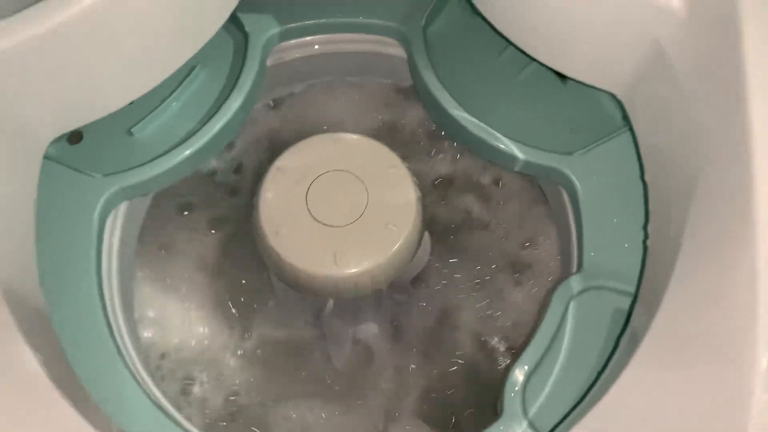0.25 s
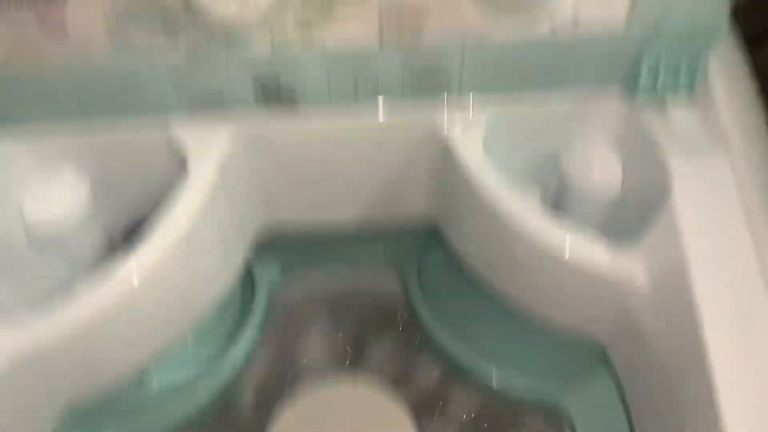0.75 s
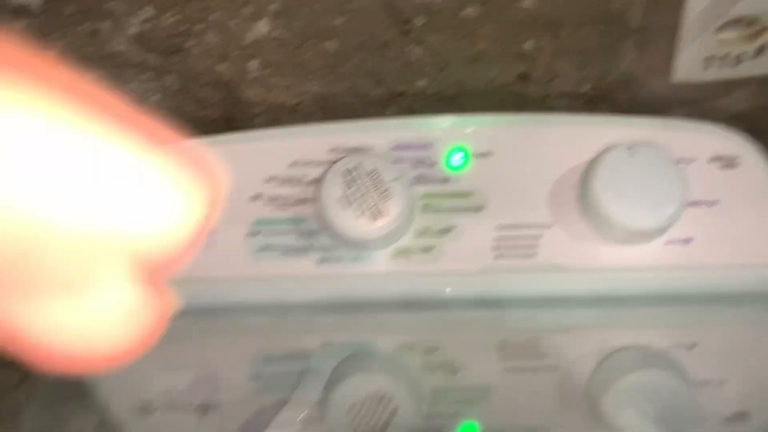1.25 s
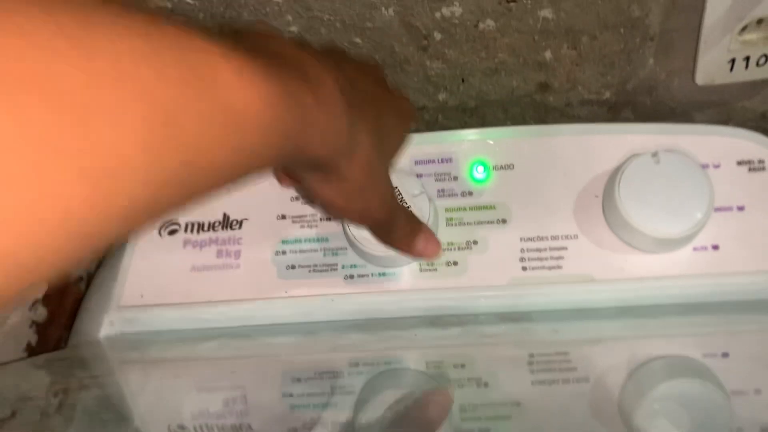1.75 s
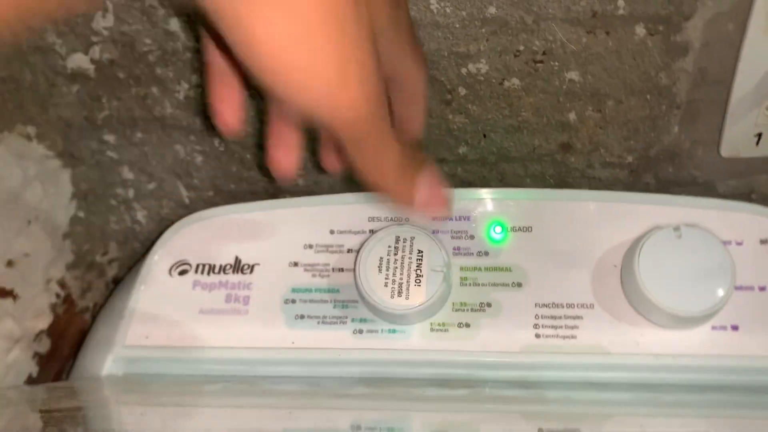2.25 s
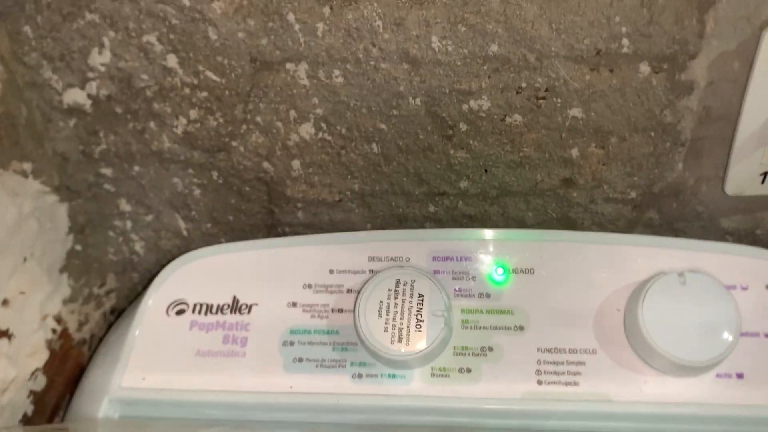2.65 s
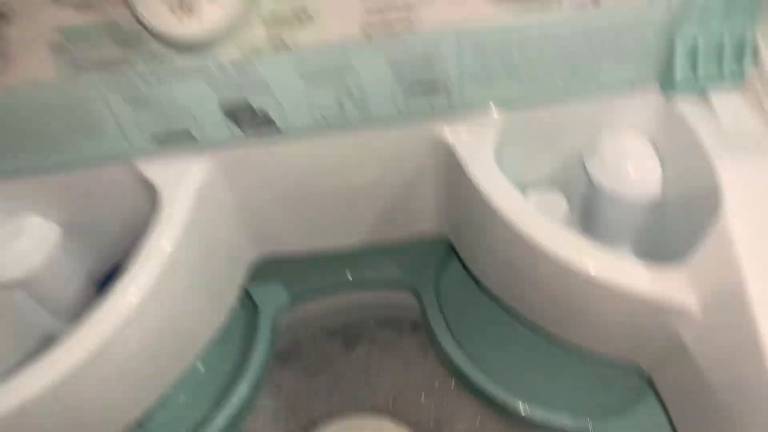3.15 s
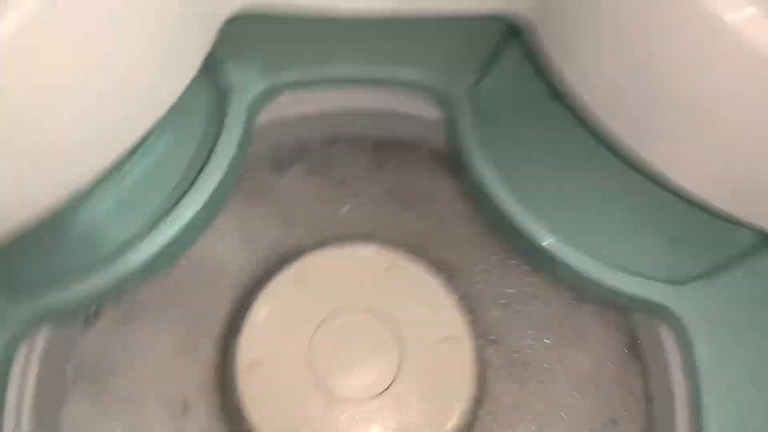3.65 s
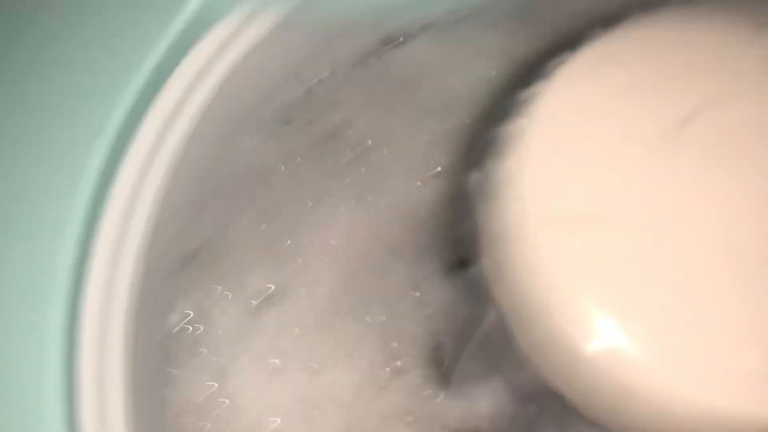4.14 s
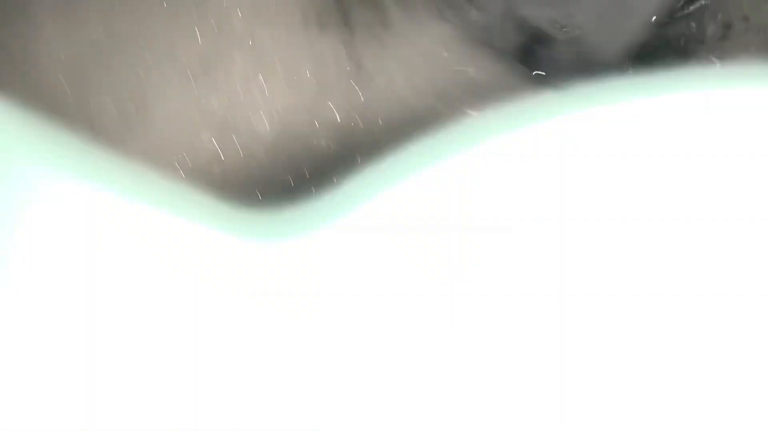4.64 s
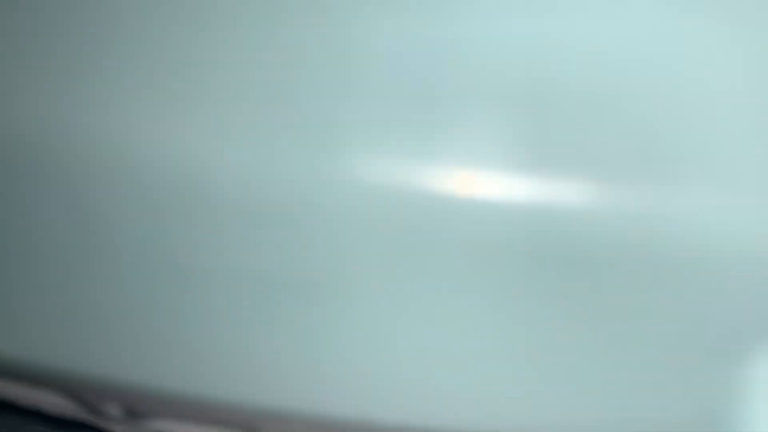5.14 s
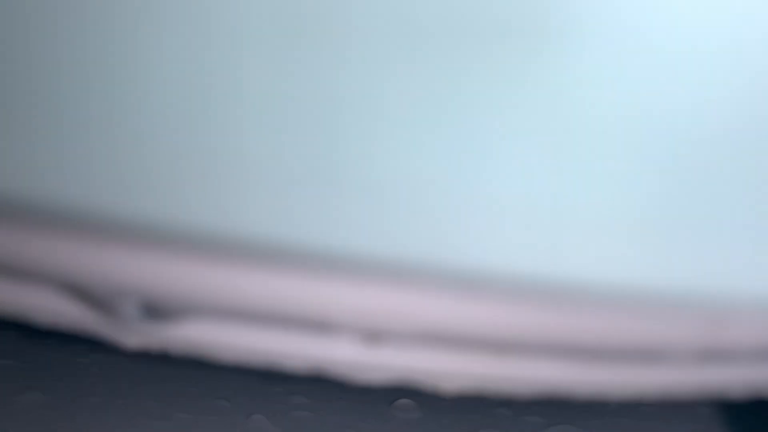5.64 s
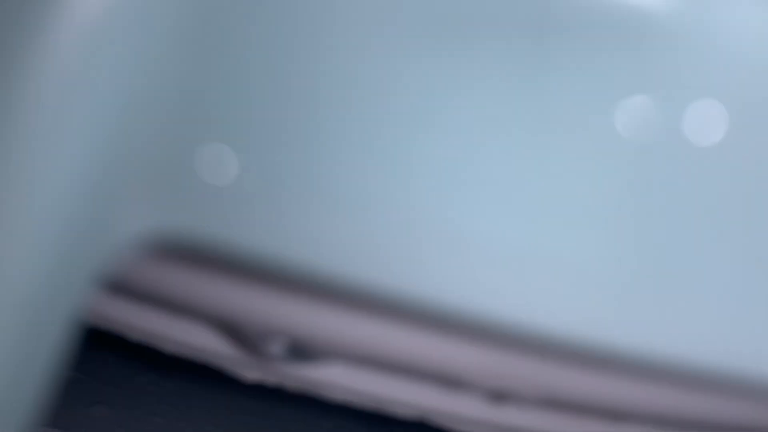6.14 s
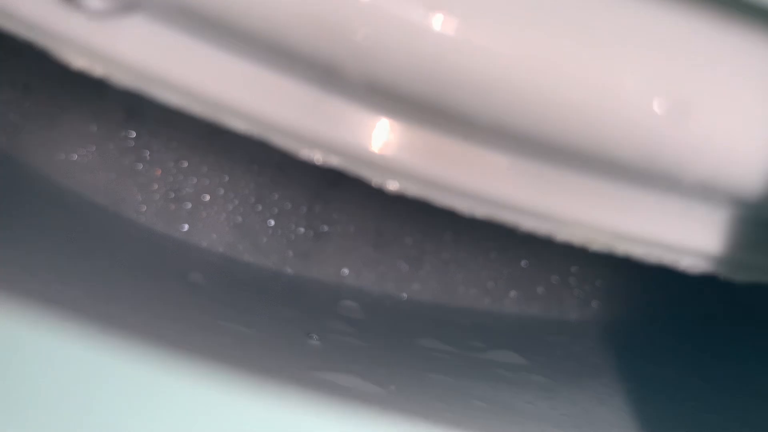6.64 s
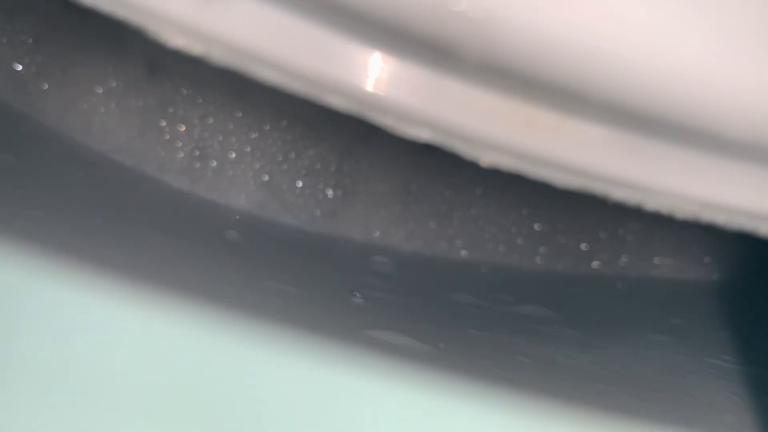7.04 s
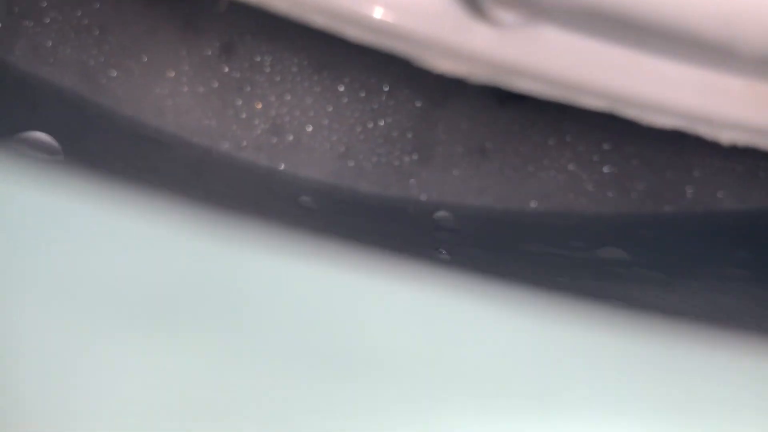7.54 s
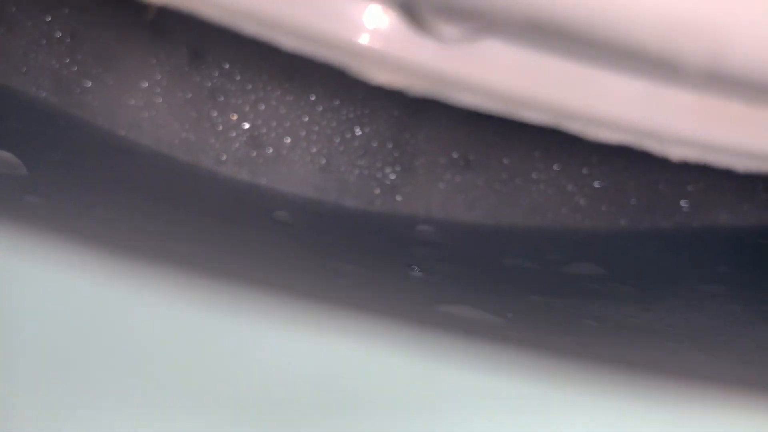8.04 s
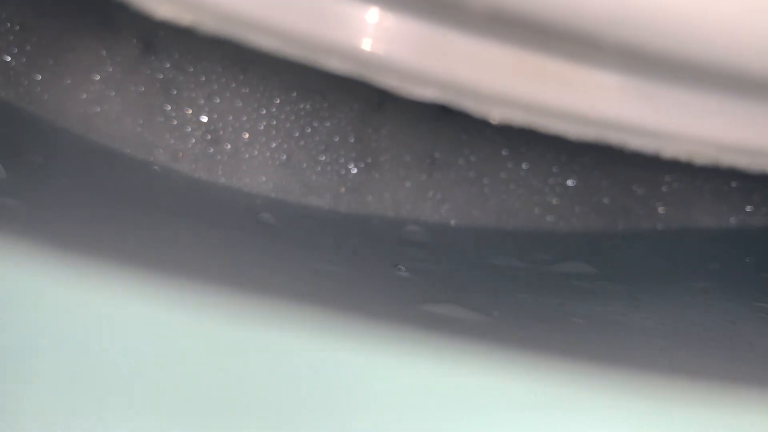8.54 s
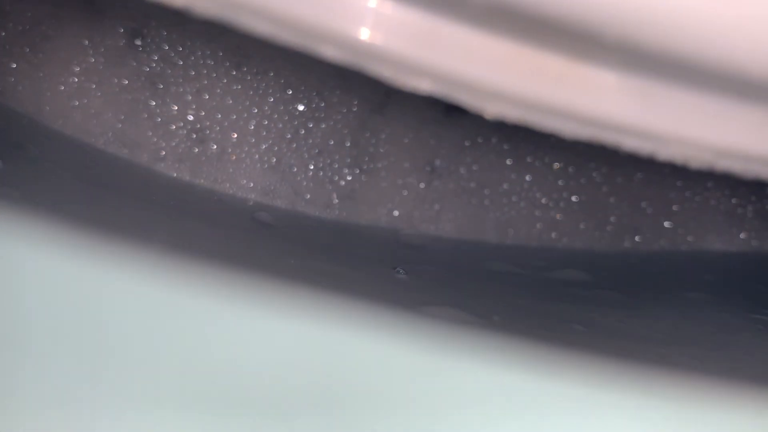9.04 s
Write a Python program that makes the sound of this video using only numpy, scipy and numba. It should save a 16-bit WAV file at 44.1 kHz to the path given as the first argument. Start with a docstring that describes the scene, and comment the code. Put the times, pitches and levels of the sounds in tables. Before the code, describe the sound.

A top-loading washing machine churns soapy water with hums and splashes, its plastic lid claps shut and lifts, then loud close gulping strokes.

```python
"""Soapy water gulps, splashes and foams as a top-loading washing machine swings its agitator; the motor hums.
The plastic lid claps shut and is lifted again, then the microphone moves down to the rim of the tub, with
a bump and a few brushes of the hand, and the strokes there are loud and wide. Water is clouds of dying sines
that climb in pitch; tub, plastic and lid ring at their own notes; the motor is steady tones and shaken
resonances; hinges, hand and drops are coloured noise."""
import sys
import numpy as np
from scipy import signal
from scipy.fft import rfft, irfft, next_fast_len
from scipy.io import wavfile
from scipy.ndimage import uniform_filter1d
from numba import njit

SR = 44100
rng = np.random.default_rng(int(sys.argv[2]) if len(sys.argv) > 2 else 0)


def generate_wav(signal):
    """Clip the signal to [-1, 1] and save it as 16-bit WAV at the path in sys.argv[1]."""
    frames = np.transpose(np.atleast_2d(signal))
    scaled = np.clip(frames, -1, 1) * 32767
    pcm = np.round(scaled).astype(np.int16)
    wavfile.write(sys.argv[1], SR, pcm)


N = 409688
TIME = np.arange(N) / SR
SHORT = TIME[:SR // 2]   # half a second, for single sounds


def from_db(db):
    """Turn decibels into gain."""
    return 10 ** (np.asarray(db) / 20)


def rms_one(x):
    """Scale to an average strength (rms) of 1."""
    return x / np.sqrt(np.mean(x ** 2) + 1e-20)


def in_time(rows):
    """Read a table whose first column is time, and draw each other column as a curve."""
    s, *columns = np.transpose(rows)
    return [np.interp(TIME, s, c) for c in columns]


def drift(rate):
    """Random values of spread 1, rate of them a second, joined by straight lines."""
    return np.interp(TIME * rate, np.arange(4000), rng.standard_normal(4000))


def colour(x, points):
    """Filter through (frequency [Hz], gain [dB]) points, with no sound ahead of its cause (minimum phase)."""
    size = 2 * next_fast_len(x.shape[-1] // 2 + 4096)
    hz, db = np.transpose(points)
    grid = np.maximum(np.fft.rfftfreq(size, 1 / SR), 1)
    gain = from_db(np.interp(np.log(grid), np.log(hz), db))
    # folding the cepstrum forward in time gives the minimum-phase filter
    cepstrum = irfft(np.log(gain))
    cepstrum[1:size // 2] *= 2
    cepstrum[size // 2 + 1:] = 0
    return irfft(rfft(x, size) * np.exp(rfft(cepstrum)))[..., :x.shape[-1]]


def add(track, s, sound):
    """Mix a sound into a track at time s."""
    at = max(round(s * SR), 0)
    track[:, at:at + sound.shape[-1]] += sound[..., :N - at]


def dying(t60):
    """Half a second of fading that falls 60 dB in t60 seconds."""
    return from_db(-60 * SHORT / t60)


def ring(hz, t60, rise=0):
    """A dying sine whose pitch climbs by the share rise within its t60."""
    return dying(t60) * np.sin(2 * np.pi * hz * SHORT * (1 + rise * np.minimum(SHORT / t60, 2) / 2))


def hollow(x, t60, wet_db):
    """Dense reflections between the tub's walls, different for centre and sides."""
    tail = rng.standard_normal((2, SR // 2)) * dying(t60) * (SHORT > .002)
    tail /= np.sqrt(np.sum(tail ** 2, axis=1, keepdims=True))
    return x + from_db(wet_db) * signal.fftconvolve(x[:1], tail, axes=1)[:, :N]


@njit
def sum_bubbles(out, at, turn, height, side, cycles, rise):
    """Each bubble is a dying sine that climbs as it nears the surface."""
    for k in range(len(at)):
        length = int(cycles * 2 * np.pi / turn[k]) + 1
        step = np.exp(-np.log(1000) / length + 1j * turn[k])   # falls 60 dB over its length
        climb = np.exp(1j * turn[k] * rise / length)
        z = height[k] + 0j
        for i in range(at[k], min(at[k] + length, out.shape[1])):
            out[0, i] += z.imag
            out[1, i] += z.imag * side[k]
            z *= step
            step *= climb
    return out


def bubbles(spectrum, per_s, cycles, spread_db, clump_db, rise, wet_db):
    """A cloud of bubbles born in clumps and ringing in the tub; its slow swells are mostly evened out."""
    rate = per_s * rms_one(from_db(clump_db * drift(55)))
    at = np.flatnonzero(rng.random(N) < rate / SR)
    pitch, size, bearing = rng.random((len(at), 3)).T
    lowest_hz, highest_hz = spectrum[0][0], spectrum[-1][0]
    hz = lowest_hz * (highest_hz / lowest_hz) ** pitch
    height = hz * from_db(spread_db * np.minimum(-np.log(1 - size), 4))
    side = np.sqrt(2) * np.cos(2 * np.pi * bearing)
    turn = 2 * np.pi * hz / SR
    cloud = sum_bubbles(np.zeros((2, N)), at, turn, height, side, float(cycles), float(rise))
    cloud = rms_one(hollow(colour(cloud, spectrum), t60=0.14, wet_db=wet_db))
    return cloud / np.sqrt(uniform_filter1d(cloud[0] ** 2, size=3500) + 0.12)


def room_tone():
    """The steady background: noise that is strongest in the bass."""
    # (frequency [Hz], gain [dB])
    room_colour = [(20, -4), (35, 6), (55, 2.5), (140, 0), (192, 0), (245, -16), (370, -13), (540, -22.5),
                   (700, -40.5), (1400, -33), (3000, -40), (5500, -40.5), (10000, -51.5), (16000, -45.5)]
    return from_db(-44) * rms_one(colour(rng.standard_normal((2, N)), room_colour))


def surge(start, stop, rise_s, db_per_s):
    """Water gathers speed, is driven until stop, then settles into a faint backwash; as power."""
    backwash_db, backwash_db_per_s = -15.5, 26
    after = np.clip(TIME - stop, 0, 3)
    level_db = np.maximum(-db_per_s * after, backwash_db - backwash_db_per_s * after)
    return (np.clip((TIME - start) / rise_s, 0, 1) * from_db(level_db)) ** 2


def churning():
    """How hard the depths, the air pockets, the surface and the foam are stirred: four levels in dB."""
    # surges of the water: (start [s], stop [s], rise [s], basic settling rate [dB/s],
    # rumble [dB], gulps [dB], splash [dB], foam against splash [dB])
    stirrings = [(-.1, 0.027, .05, 65, -33.5, -41, -45, -3.5),
                 (0.057, 0.27, 0.027, 116, -42, -57, -50.5, -2),
                 (0.262, 0.612, 0.08, 188, -49, -39, -45, -6),
                 (0.345, 0.368, 0.03, 250, -26, -55, -36.5, -6),
                 (0.893, 1.602, 0.12, 42, -37.5, -42, -47, -6),
                 (1.077, 1.17, 0.015, 113, -27, -50, -71, -8),
                 (1.756, 2.003, 0.015, 50, -42, -39, -42, -12),
                 (2.246, 3.21, 0.098, 72, -55, -57.5, -67, -43),
                 (3.594, 3.925, 0.14, 92, -40, -72, -58.5, -6),
                 (4.054, 4.21, 0.034, 67, -29.5, -38, -52, -1),
                 (4.192, 4.255, 0.1, 176, -50, -61, -38.5, -5.5),
                 (4.477, 4.665, 0.053, 116, -30, -30, -48, -3),
                 (4.79, 5.13, 0.056, 67, -44.5, -44, -73, -28),
                 (5.292, 5.44, 0.034, 226.5, -35.5, -44, -60.5, -16),
                 (6.634, 6.795, 0.038, 83, -28, -28, -46, -4),
                 (7.012, 7.31, 0.43, 103, -32.5, -39, -83, -10),
                 (7.347, 7.994, 0.079, 58, -28, -29, -40.5, -2.5),
                 (8.111, 8.21, 0.026, 220, -27, -35, -49, -7),
                 (8.245, 8.34, 0.0084, 33, -35, -33.5, -43.5, -9),
                 (8.576, 9.247, 0.25, 88, -29, -28.5, -37.5, -5.5),
                 (8.792, 8.872, 0.058, 350, -11, -25.5, -52, -12)]
    surface_lag_s, rumble_lag_s = 0.024, 0.039   # the surface breaks late, the whole body moves later still
    deep_settling, foam_settling = 0.79, 0.96   # shares of the settling rate
    waver_db, own_waver_db, waver_per_s = 2.5, 0.95, 22   # uneven sloshing: shared, and each layer's own
    power = np.full((4, N), 1e-12)
    for start, stop, rise_s, settling, rumble_db, gulp_db, splash_db, foam_db in stirrings:
        deep_rate, foam_rate = settling * deep_settling, settling * foam_settling
        surface_start = start + surface_lag_s
        power[0] += from_db(rumble_db) ** 2 * surge(start + rumble_lag_s, stop, rise_s, deep_rate)
        power[1] += from_db(gulp_db) ** 2 * surge(start, stop, rise_s, deep_rate)
        power[2] += from_db(splash_db) ** 2 * surge(surface_start, stop, rise_s, settling)
        power[3] += from_db(splash_db + foam_db) ** 2 * surge(surface_start, stop, rise_s, foam_rate)
    own = np.array([drift(waver_per_s) for _ in power])
    return 10 * np.log10(power) + waver_db * drift(waver_per_s) + own_waver_db * own


def water():
    """Bubble clouds of every size, from the big air pockets that shake the tub to the bursting foam."""
    # colours of the bubble clouds, deepest first: (frequency [Hz], gain [dB])
    deep_colour = [(30, -53), (40, -31), (52, -10.5), (66, -18), (82, -4.5), (98, -14.5), (135, -23.5),
                   (220, -43)]
    gulp_colour = [(85, -26.5), (128, 1), (155, 2), (205, 6.5), (245, -5.5), (380, -35)]
    glug_colour = [(190, -34.5), (265, 1), (345, 1), (440, 0.5), (560, -10), (700, -32), (1100, -33)]   # middle-sized air pockets
    splash_colour = [(400, -13.5), (650, 3.5), (870, 0), (1000, 2), (1450, 2), (2100, -2.5), (2800, -2.5),
                     (4500, -46)]
    gurgle_colour = [(550, 6.5), (850, -4.5), (1500, -2.5), (2400, -4), (4200, -17)]   # bigger bubbles within the splash
    spray_colour = [(1700, 1.5), (2800, -0.5), (3900, 3), (5000, -1.5), (7000, -3.5), (8500, -13),
                    (11000, -59)]
    foam_colour = [(6500, -10), (8800, -1.5), (10300, 3), (12300, 0), (15500, 1.5), (17000, -15)]
    rumble_db, gulp_db, splash_db, foam_db = churning()
    # small crests break one after another, throwing splash and foam together
    burst_db = 2.0 * drift(50)
    rumble, gulps, splash, foam = from_db([rumble_db, gulp_db, splash_db + burst_db, foam_db + burst_db])
    # glugs follow a mix of gulps and splash, and grow faster than it does
    stirring_db = gulp_db + 0.3 * (splash_db - gulp_db)
    glugs = from_db(-38 + 1.33 * (stirring_db + 40))
    spray = from_db(-1.5 + (splash_db + foam_db) / 2)
    # splashing gentler than -41 dB traps few large bubbles
    gurgle = from_db(-0.5) * splash * np.minimum(splash / from_db(-41), 1)
    out = rumble * bubbles(deep_colour, per_s=200, cycles=8.3, spread_db=1, clump_db=2, rise=.04, wet_db=-16.5)
    out += gulps * bubbles(gulp_colour, per_s=260, cycles=21.4, spread_db=2, clump_db=2, rise=.092, wet_db=-8.5)
    out += glugs * bubbles(glug_colour, per_s=520, cycles=16.4, spread_db=4, clump_db=3, rise=.1, wet_db=-4)
    out += splash * bubbles(splash_colour, per_s=2600, cycles=40, spread_db=6, clump_db=3, rise=.31, wet_db=-.5)
    out += gurgle * bubbles(gurgle_colour, per_s=260, cycles=49, spread_db=6.5, clump_db=5.5, rise=.35,
                            wet_db=4.5)
    out += spray * bubbles(spray_colour, per_s=1200, cycles=45, spread_db=2, clump_db=4, rise=.17, wet_db=4.5)
    out += foam * bubbles(foam_colour, per_s=1700, cycles=28, spread_db=-.5, clump_db=4.5, rise=.03, wet_db=3.5)
    return out


def motor(start_s, stop_s, hum_waver, buzz_waver, drive_db):
    """The motor hums at even multiples of the mains and shakes the cabinet; the load makes it waver."""
    # (middle of start [s], middle of stop [s], hum [dB], cabinet buzz [dB])
    runs = [(-.1, 0.038, -29, -39.5), (0.984, 1.613, -56, -46.5), (4.083, 4.25, -51, -51.5),
            (4.527, 4.614, -27, -41.5), (6.682, 6.753, -20, -44.5), (7.446, 7.988, -21.5, -39.5),
            (8.71, 9.236, -14.5, -38)]
    # the motor's hum, and the buzz of the panels: (multiple of the mains, level [dB], sideways share [dB])
    hum_lines = [(2, -7, -9), (4, -5.5, -24), (8, -19, -19)]
    buzz_lines = [(10, 0, 5.5), (12, -4, 11.5), (14, -20, -9), (18, -22, 11)]
    # ringing of drive and cabinet: (frequency [Hz], width of one pass [Hz], level [dB], sideways share [dB])
    resonances = [(83.5, 9, 13, -10), (213, 18, 9, 1), (403, 24, 4, -18), (445, 27, 4, -8),
                  (541, 22, -8, -2), (674, 56, -11, 3), (862, 32, -3.5, 6.5), (1090, 41, -9, 6.5),
                  (1246, 34, -3.5, -7), (1426, 65, -6, -8), (1553, 76, -10.5, 5), (1990, 70, -13, -5),
                  (2635, 52, -21, 2), (3403, 110, -11.5, 0)]
    mains_hz = 60
    load_db, load_per_s = 2.5, 7   # each line swells and sinks on its own
    hum, buzz, out = np.zeros(N), np.zeros(N), np.zeros((2, N))
    for on, off, hum_db, buzz_db in runs:
        starting = np.clip((TIME - on) / start_s + .5, 0, 1)
        running = starting * np.clip((off - TIME) / stop_s + .5, 0, 1)
        hum += from_db(hum_db) * running
        buzz += from_db(buzz_db) * running
    for level, lines, waver in ((hum, hum_lines, hum_waver), (buzz, buzz_lines, buzz_waver)):
        for multiple, db, side_db in lines:
            phase = 2 * np.pi * (multiple * mains_hz * TIME + rng.random()) + waver * drift(13)
            load = rms_one(from_db(load_db * np.clip(drift(load_per_s), -3, 1)))
            gain = np.sqrt(2) * level * from_db(db) * (1 + waver * drift(22)) * load
            out += gain * np.array([np.sin(phase), from_db(side_db) * np.cos(phase)])
    shaking = rng.standard_normal((2, N))
    for hz, width_hz, db, side_db in resonances:
        steep = [np.concatenate(signal.iirpeak(hz, hz / width_hz, SR))] * 2   # the resonance twice over
        gain = from_db([[db + drive_db], [db + drive_db + side_db]])
        out += buzz * gain * rms_one(signal.sosfilt(steep, shaking))
    return out


def groans(t60, spread, attack_s):
    """The loaded drive sounds a brief rough note: a cluster of close tones that swell and glide in pitch."""
    # (time [s], level [dB], middle pitch [Hz], climb in pitch as a share)
    notes = [(0.01, -35, 620, 0.15), (0.965, -34, 704, 0.2), (4.066, -30.5, 738, -.5),
             (4.105, -28.5, 560, 0.83), (4.505, -25, 490, .8), (6.69, -32, 736, 0.23),
             (7.388, -26.5, 774, -.25), (8.68, -27.5, 737, -0.17)]
    out, swell = np.zeros((2, N)), np.minimum(SHORT / attack_s, 1)
    for s, db, hz, climb in notes:
        for detune, bearing in rng.uniform(-1.036, 1, (9, 2)):
            tone = swell * ring(hz * (1 + spread * detune), t60, climb)
            add(out, s, from_db(db) / np.sqrt(9) * tone * [[1], [bearing]])
    return hollow(out, t60=0.14, wet_db=1)


def splashes(plop_db, slap_db, attack_s, brood_db, scatter):
    """Bubbles and droplets ring with a gliding note and shed others; crests slap the wall with bursts of drops."""
    # single bubbles, air pockets and droplets: (time [s], level before plop_db [dB], pitch [Hz])
    single_drops_and_bubbles = [(0.341, -18, 1620), (.366, -20, 1510), (.372, -27, 326), (.489, -24.5, 906),
                                (.518, -23, 1330), (1.309, -19.5, 4350), (1.367, -19.5, 3700),
                                (1.483, -20.5, 4540), (1.522, -14.5, 4500), (1.607, -18.5, 3960),
                                (1.669, -20.5, 1416), (1.788, -12, 1085), (1.818, -6, 310.6),
                                (1.86, -24, 310), (1.898, -20, 1103), (1.936, -17, 337), (2.027, -20, 1900),
                                (4.607, -14, 1235), (4.694, -14.5, 1360), (4.714, -20, 1586),
                                (6.766, -12, 288), (6.79, -18.5, 1326), (7.424, -21, 1530),
                                (7.674, -18, 1760), (7.723, -15, 1840), (7.747, -15.5, 1480),
                                (7.805, -11, 1450), (7.808, -14, 1940), (7.892, -19, 1650),
                                (8.054, -17, 2400), (8.082, -16.5, 3280), (8.16, -20.5, 1646),
                                (8.281, -15, 874), (8.316, -18, 1490), (8.34, -24, 1616),
                                (8.373, -34, 1100), (8.885, -13, 2700), (8.912, -13.5, 1620),
                                (8.975, -14.5, 1474), (8.986, -21, 1900), (9.08, -12.5, 2040),
                                (9.103, -16, 1680), (9.18, -11, 1885), (9.206, -13.5, 4640),
                                (9.227, -11.5, 1405), (9.243, -14, 4050)]
    # slaps and ticks on the plastic, mostly of crests and drops:
    # (time [s], level before slap_db [dB], treble tilt [dB], t60 [s])
    wall_slaps = [(0.053, -38.5, 5.5, .03), (0.116, -41, 12, 0.024), (0.145, -32, 1, 0.031),
                  (0.224, -41, 7.5, 0.064), (0.338, -23, -6, 0.023), (.356, -29, 0, 0.064),
                  (0.39, -32, 3, 0.026), (.427, -30.5, 4.5, 0.03), (0.486, -39.5, 13.5, 0.029),
                  (0.521, -37.5, 2, 0.11), (.57, -47, 9, 0.036), (.613, -34, -9, 0.016),
                  (0.627, -40, 12.5, 0.016), (0.834, -33, -5, 0.12), (1.285, -31.5, -4.5, 0.11),
                  (1.327, -27.5, -1.5, 0.064), (1.742, -35, 4, 0.052), (1.787, -16.5, -8, 0.024),
                  (1.806, -21.5, -9, 0.059), (1.826, -23, -3, 0.037), (1.898, -31, -9, 0.023),
                  (1.915, -30.5, 2.5, 0.055), (1.983, -33.5, 2.5, 0.078), (2.225, -42.5, -3, 0.13),
                  (2.286, -36, 1.5, 0.034), (3.619, -40, -1, 0.026), (4.262, -35, -4, 0.17),
                  (4.281, -33, -4, 0.21), (4.497, -29.5, -36, 0.11), (4.539, -37, 1, .03),
                  (4.573, -27.5, -11, 0.065), (4.604, -28, 0, 0.13), (4.691, -25.5, -3, 0.071),
                  (4.71, -30.5, 0, 0.049), (6.413, -49, -2, 0.021), (6.783, -47, -24, 0.069),
                  (7.473, -22, -5, 0.037), (7.639, -23.5, -9, 0.1), (7.67, -17.5, -6.5, 0.072),
                  (7.895, -19, -15, 0.04), (7.961, -19.5, -10, 0.089), (8.159, -29, -19, 0.057),
                  (8.195, -25, 0.5, 0.027), (8.335, -29, -1.5, 0.085), (8.435, -33.5, -9, 0.11),
                  (8.518, -40.5, 3, 0.15), (9.206, -36, 3.5, 0.23)]
    cycles, rise = 38, 0.071   # cycles that each one rings; its climb in pitch as a share
    plops, slaps = np.zeros((2, N)), np.zeros((2, N))
    for s, db, hz in single_drops_and_bubbles:
        t60 = cycles / hz
        swell = np.minimum(SHORT * hz / 2, 1)   # a bubble needs two cycles to pinch off
        add(plops, s, from_db(db + plop_db) * swell * ring(hz, t60, rise) * [[1], [rng.normal(0, 0.56)]])
        for delay, octaves, bearing in rng.uniform(-1.2, 1, (5, 3)):
            follower = swell * ring(hz * 2 ** (scatter * (octaves + 0.24)), t60 / 2, rise)
            add(plops, s + t60 * (delay + 1) / 4, from_db(db + brood_db) * follower * [[1], [2 * bearing]])
    for s, db, treble_db, t60 in wall_slaps:
        burst = rng.standard_normal((2, SR // 2)) * dying(t60) * np.minimum(SHORT / attack_s, 1)
        shape = [(400, -13.5), (1200, 3.5), (2200, 3.5), (4500, treble_db - 0.5), (14000, 2 * treble_db - 10.5)]
        add(slaps, s, from_db(db + slap_db) * colour(burst, shape))
    return hollow(plops + slaps, t60=0.19, wet_db=-5.0)


def thud(db, centre_hz, focus_db):
    """A blow rings the tub's notes, weaker by focus_db per squared octave away from its strongest pitch."""
    # notes of the water-filled tub: (frequency [Hz], level [dB], t60 [s])
    tub_modes = [(51.6, 5, 0.15), (82.5, 4.5, 0.095), (106.5, -5, 0.24), (159.8, 2, 0.18),
                 (195.2, -0.5, 0.13), (271.4, 2, 0.092), (347.5, 3, 0.087), (468, 0.5, 0.06),
                 (543, -7, 0.13)]
    out = np.zeros((2, SR // 2))
    for hz, mode_db, t60 in tub_modes:
        away_db = focus_db * np.log2(hz / centre_hz) ** 2
        gain = from_db(db + mode_db - away_db + rng.normal(0, 1))
        push = np.minimum(SHORT * hz, 1)   # a soft push, over about one cycle
        out += gain * push * ring(hz, t60) * [[rng.choice([-1, 1])], [rng.normal(0, 1.0)]]
    return out


def knocks(focus_db):
    """Water, agitator and the closing lid knock heavily on the machine, and the tub's notes ring."""
    # (time [s], level [dB], strongest pitch [Hz])
    blows = [(.185, -33.5, 150), (0.273, -27.5, 269), (0.341, -20.5, 171), (0.392, -22, 129),
             (0.439, -28, 200), (0.578, -29.5, 370), (0.859, -21.5, 200), (1.823, -18.5, 286),
             (4.071, -26.5, 181), (4.51, -17, 172), (4.604, -21, 150), (4.612, -20.5, 420),
             (6.647, -14.5, 240), (7.215, -37.5, 390), (7.361, -20, 246), (7.623, -16, 256),
             (7.961, -23, 460), (8.135, -10.5, 119), (8.198, -18, 340), (8.546, -26, 527),
             (8.859, -21, 410)]
    out = np.zeros((2, N))
    for s, db, centre_hz in blows:
        add(out, s, thud(db, centre_hz, focus_db))
    return out


def clunks(contact_s):
    """Short, hollow knocks of plastic, from the agitator or the turned dial: a set of dying notes."""
    # (time [s], level [dB])
    hollow_knocks = [(.272, -24.5), (.338, -22.5), (.442, -23.5), (.613, -25), (1.787, -23.5), (1.868, -26),
                     (4.064, -38), (4.49, -26), (4.61, -25.5), (6.636, -37.5), (7.212, -49), (7.354, -36.5),
                     (8.135, -37), (8.198, -28), (8.281, -17.5)]
    # what the plastic rings with: (frequency [Hz], level [dB], t60 [s])
    plastic_modes = [(546, -5.5, 0.05), (624, -4, 0.032), (810, -7, 0.036), (894, -5, 0.043),
                     (996, -7.5, 0.04), (1118, -6, 0.044), (1370, -10.5, 0.037), (1613, -14, 0.034)]
    out = np.zeros((2, N))
    contact = np.minimum(SHORT / contact_s, 1)
    for s, db in hollow_knocks:
        for hz, mode_db, t60 in plastic_modes:
            gain = from_db(db + mode_db + rng.normal(0, 0.61)) * rng.choice([-1, 1])
            add(out, s, gain * contact * ring(hz, t60) * [[1], [rng.normal(0, .6)]])
    return hollow(out, t60=.14, wet_db=-4)


def lid(clap_t60, tail_db, tail_t60, sharpness):
    """The lid claps shut: a short crack, a tail in the cabinet and the ringing of its own notes."""
    # colour of the clap: (frequency [Hz], gain [dB])
    clap_colour = [(71, -47), (120, -20), (362, -6.5), (513, -4), (1030, -7), (1490, -11.5), (2150, -3),
                   (2430, -6), (3900, -1.5), (7200, -12), (8660, -5), (9790, -11), (16000, -23)]
    # ringing of the lid: (frequency [Hz], level before tail_db [dB], t60 [s])
    lid_modes = [(192, -13, 0.59), (988, 8.5, 0.36), (1381, 6, 0.26), (1600, 4, 0.15), (1890, -12.5, 0.25),
                 (2235, 5.5, 0.5), (2730, 6, 0.35), (2994, -10, 0.25), (3270, 6.5, 0.39), (3510, -10, .45),
                 (3860, 6, 0.61), (4120, -7, 0.54), (4410, -2.5, 1), (4600, -22, .5), (4900, -9, .5),
                 (4930, -3, 0.76), (5715, -14.5, 0.39), (6530, -4, 0.83), (6570, -17, .5), (6680, -21, .5),
                 (7130, -8.5, 0.67), (8300, -18, .5)]
    clap_s, clap_db = .8435, -15
    out, ringing = np.zeros((2, N)), 0
    attack = np.minimum(SHORT / 0.0017, 1)
    crack = rms_one(colour(rng.standard_normal((2, SR // 2)), clap_colour))
    for hz, db, t60 in lid_modes:
        mode = rms_one(signal.lfilter(*signal.iirpeak(hz, sharpness, SR), crack))
        ringing = ringing + from_db(db) * dying(t60) * mode
    blow = crack * (dying(clap_t60) + from_db(-20) * dying(tail_t60)) + from_db(tail_db) * ringing
    add(out, clap_s, from_db(clap_db) * attack * blow)
    return out


def bumps(focus_db):
    """Hand and microphone bump the machine so close that one side hears it more; left and right."""
    # (time [s], level [dB], strongest pitch [Hz], left minus right [dB])
    touches = [(1.137, -24.5, 99, 9), (3.626, -22, 58, -2.5), (5.322, -24.5, 294, -5),
               (5.326, -13.5, 77, -10.5), (5.334, -23, 159, -4)]
    out = np.zeros((2, N))
    for s, db, centre_hz, pan_db in touches:
        add(out, s, thud(db, centre_hz, focus_db)[0] * from_db([[pan_db / 2], [-pan_db / 2]]))
    return out


def trickle():
    """Water trickles down the walls: countless tiny bubbles merge into a smooth wash that comes and goes."""
    # (time [s], level [dB])
    wash_level = [(1.75, -85), (1.85, -61), (2.08, -42.5), (2.3, -54.5), (2.6, -55.5), (3.0, -59.5),
                  (3.32, -57.5), (3.48, -73), (3.7, -62), (4.0, -70), (4.4, -90)]
    # (frequency [Hz], gain [dB])
    wash_colour = [(380, -8), (520, 10.5), (750, 5.5), (1300, -0.5), (2000, -5.5), (2700, -8), (4000, -8),
                   (7000, -19)]
    wash = bubbles(wash_colour, per_s=7000, cycles=10, spread_db=-1.0, clump_db=1.06, rise=.1, wet_db=3.5)
    return from_db(in_time(wash_level)[0]) * wash


def chirps(top_hz, end_hz, length_s):
    """Thin, short whistles at the top of hearing that fall in pitch, with a brief echo."""
    # (time [s], level [dB])
    whistles = [(1.905, -36), (2.655, -32), (3.868, -36), (4.695, -33), (5.888, -42), (6.533, -45)]
    out, along = np.zeros((2, N)), np.linspace(0, 1, round(length_s * SR))
    falling_hz = top_hz + (end_hz - top_hz) * along
    whistle = np.sin(np.pi * along) * np.sin(2 * np.pi * np.cumsum(falling_hz) / SR)
    for s, db in whistles:
        add(out, s, from_db(db) * whistle)
    return hollow(out, t60=0.22, wet_db=-8.0)


def swept(x, centre_hz, octaves):
    """A broad resonance that follows centre_hz, as a cross-fade between narrow bands."""
    out = 0
    for hz in np.geomspace(2500, 15500, 12):
        nearness = np.exp(-(np.log2(hz / centre_hz) / octaves) ** 2)
        out = out + nearness * signal.lfilter(*signal.iirpeak(hz, 7, SR), x)
    return rms_one(out)


def lifting_lid(rub_db, sing_db, sweep_db, coupling_db, shifts_per_s, judder_db, focus_db):
    """As the lid lifts, its hinges hiss in a moving colour and sing in notes that vary with the contact."""
    # how strongly the hinges rub: (time [s], level [dB])
    hinge_level = [(2.62, -76), (2.635, -56), (2.665, -50), (2.71, -58.5), (2.8, -60), (2.84, -51.5),
                   (3.13, -46), (3.28, -47.5), (3.345, -54), (3.4, -74)]
    # where the hiss is strongest: (time [s], frequency [Hz])
    hinge_pitch = [(2.67, 4400), (2.83, 3000), (2.9, 3700), (2.97, 6460), (3.12, 11100), (3.27, 15000)]
    # colour of the rubbing: (frequency [Hz], gain [dB])
    rub_colour = [(300, -4), (650, -1), (1100, -14), (1900, -13), (2700, 0), (3900, -4), (5500, -1),
                  (6800, -4.5), (8200, -7), (9000, -4), (11000, 0), (13000, 0), (16000, 0)]
    # notes of the hinges: (frequency [Hz], width, later held within 40-130 [Hz], level [dB])
    hinge_modes = [(2690, 70, -0.5), (2930, 80, -4), (3250, 91, -0.5), (3790, 90, 1.5), (4080, 120, -0.5),
                   (4370, 140, -1.5), (4630, 130, 0), (5000, 100, -4), (5690, 70, -3), (6200, 130, -6),
                   (6500, 80, 1), (6600, 70, -4), (7100, 65, -5), (8030, 90, -4)]
    rub_growth, rub_even_db = 0.59, -46   # harder rubbing is hissier: extra dB per dB above this level
    friction = rms_one(colour(rng.standard_normal((2, N)), rub_colour) * from_db(judder_db * drift(60)))
    singing, grain = 0, rng.standard_normal((2, N))
    centre_hz, = in_time(hinge_pitch)
    for hz, width_hz, db in hinge_modes:
        coupling = from_db(db + coupling_db * np.clip(drift(shifts_per_s), -2, 1.2))
        # weaker by the octave away from the hiss
        coupling = coupling * from_db(-focus_db * np.abs(np.log2(hz / centre_hz)))
        resonance = signal.iirpeak(hz, hz / np.clip(width_hz, 40, 130), SR)
        singing = singing + signal.lfilter(*resonance, coupling * grain)
    moving = swept(rng.standard_normal((2, N)), centre_hz, octaves=0.25)
    s, db = np.transpose(hinge_level)
    level_db = np.interp(TIME, s, db, left=-120, right=-120)
    hiss = from_db(rub_db + rub_growth * (level_db - rub_even_db)) * friction
    return from_db(level_db) * (hiss + from_db(sing_db) * rms_one(singing) + from_db(sweep_db) * moving)


def brushes(bright_db):
    """The hand brushes along the plastic rim: soft grainy swishes that swell and fade."""
    # (start [s], stop [s], level [dB])
    strokes = [(5.754, 5.995, -48), (6.105, 6.225, -54), (6.177, 6.22, -51), (6.232, 6.303, -50.5)]
    # (frequency [Hz], gain [dB])
    brush_colour = [(200, 3), (500, 3), (900, -4.5), (1500, 2.5), (2200, -8.5), (3200, -17), (4100, -14.5),
                    (6000, -17.5), (10500, -20.5), (16000, -23)]
    level = np.zeros(N)
    for start, stop, db in strokes:
        level += from_db(db) * np.sin(np.pi * np.clip((TIME - start) / (stop - start), 0, 1))
    grain = rms_one(colour(rng.standard_normal((2, N)), brush_colour)) * from_db(2.2 * drift(70))
    hiss = signal.sosfilt(signal.butter(2, 3500, "high", fs=SR, output="sos"), grain)
    return level * (grain + from_db(bright_db) * level / level.max() * hiss)   # harder rubbing is brighter


def scene():
    """Everything as centre and side sound, picked up by a closely spaced pair of microphones."""
    # response to the centre, and to the sides above and inside the tub: (frequency [Hz], gain [dB])
    centre_response = [(7300, -1.5), (7900, -5), (8500, -26), (9300, -3.5), (10000, 2), (12200, 0.5),
                       (13300, -20), (14500, -5.5), (15200, -2.5)]
    sides_above = [(60, -20), (200, -14.5), (330, -14.5), (500, -9.5), (700, -24.5), (1100, -3.5),
                   (2000, -1.5), (3700, -1.5), (5500, -3), (9500, 3.5), (10900, -23.5), (12300, 2),
                   (14500, -3.5), (16000, -9.5)]
    sides_inside = [(60, -23), (200, -13.5), (380, -4), (520, -28), (600, 6.5), (705, 14), (790, -15),
                    (900, 5), (1100, 5.5), (1250, -1.5), (1600, 4.5), (2400, -1), (7000, -2.5), (9700, 6.5),
                    (10900, -27), (12300, 0.5), (14500, -1), (16000, -13)]
    # (time [s], how far the microphone is inside the tub [0-1])
    descent = [(4.2, 0.07), (4.5, 0.59)]
    left_lead_s, lead_below_hz = 0.00021, 1200   # the left microphone is a little nearer to the tub
    both = room_tone() + water()
    both += motor(start_s=0.12, stop_s=0.068, hum_waver=0.35, buzz_waver=0.14, drive_db=-4.5)
    both += groans(t60=0.22, spread=0.121, attack_s=0.023)
    both += splashes(plop_db=-7.5, slap_db=1.0, attack_s=0.0019, brood_db=-13, scatter=0.41)
    both += knocks(focus_db=17.0)
    both += clunks(contact_s=0.0058)
    both += lid(clap_t60=0.067, tail_db=-27.5, tail_t60=0.61, sharpness=75)
    both += trickle()
    both += chirps(top_hz=16100, end_hz=13600, length_s=0.023)
    both += lifting_lid(rub_db=-4.0, sing_db=-3.5, sweep_db=-2.5, coupling_db=6.5, shifts_per_s=18,
                        judder_db=2, focus_db=3)
    both += brushes(bright_db=-5)
    mid, side = both
    inside = np.clip(in_time(descent)[0], 0, 1)
    side = (1 - inside) * colour(side, sides_above) + inside * colour(side, sides_inside)
    long_waves = signal.sosfiltfilt(signal.butter(2, lead_below_hz, fs=SR, output="sos"), mid)
    side = side + left_lead_s / 2 * np.gradient(long_waves) * SR   # a small lead adds the wave's slope
    mid = colour(mid, centre_response)
    return np.array([mid + side, mid - side]) + bumps(focus_db=19.0)


def record(dry):
    """The deepest bass is rolled off and the top is cut steeply."""
    low_cut_hz, cutoff_hz = 40, 16100
    thin = signal.sosfilt(signal.butter(4, low_cut_hz, "high", fs=SR, output="sos"), dry)
    return signal.sosfiltfilt(signal.ellip(10, .1, 60, cutoff_hz, fs=SR, output="sos"), thin)


dry = scene()
out = record(dry)
generate_wav(out)
```